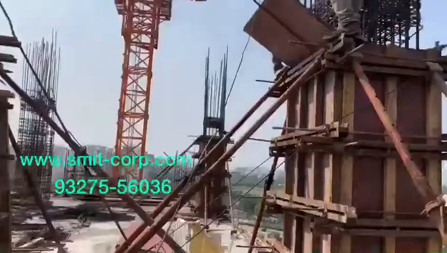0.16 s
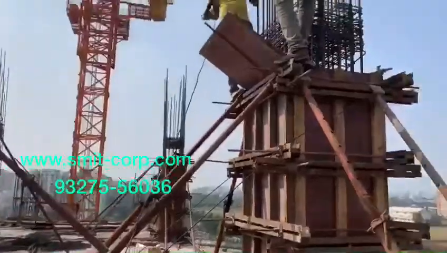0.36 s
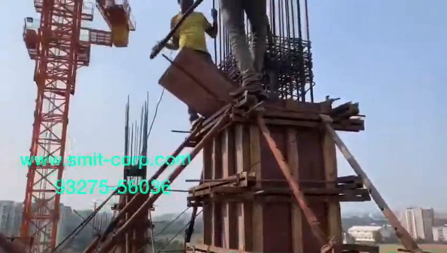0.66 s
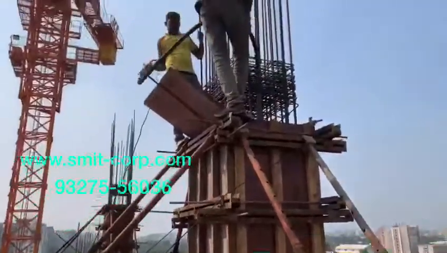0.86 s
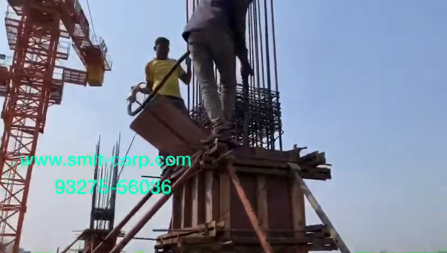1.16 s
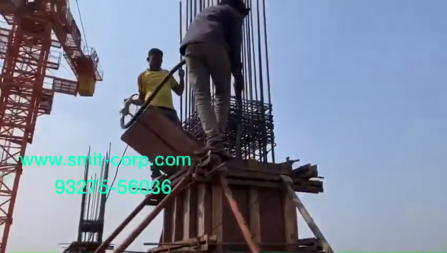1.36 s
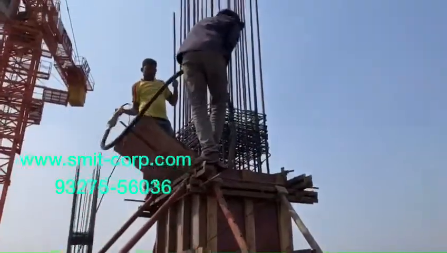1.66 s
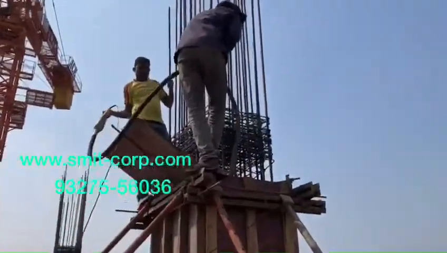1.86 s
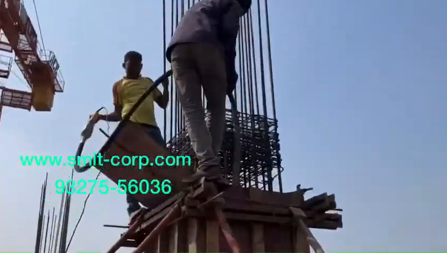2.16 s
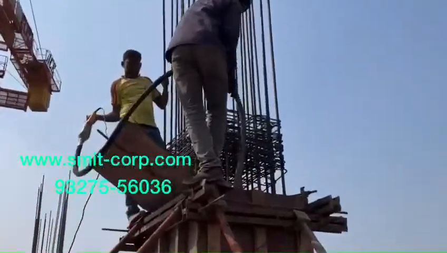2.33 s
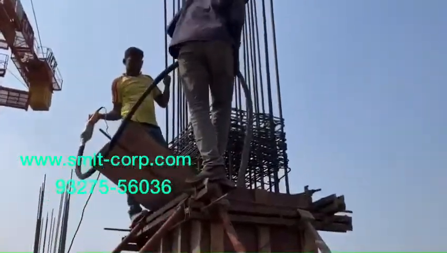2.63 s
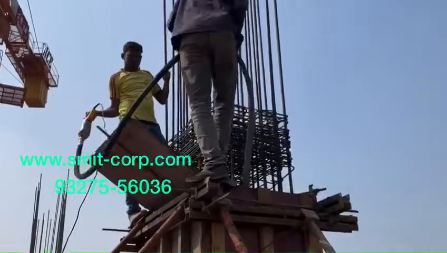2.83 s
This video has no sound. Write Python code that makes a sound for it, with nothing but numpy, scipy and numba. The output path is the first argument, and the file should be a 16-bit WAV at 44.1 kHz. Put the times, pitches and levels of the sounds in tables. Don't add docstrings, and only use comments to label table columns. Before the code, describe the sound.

High thin whine and hiss of a concrete poker vibrator, roughening with metallic squeals on an open building site

```python
import sys
import numpy as np
from scipy import signal
from scipy.fft import rfft, irfft, next_fast_len
from scipy.io import wavfile
from scipy.ndimage import uniform_filter1d
from numba import njit

SR = 44100
rng = np.random.default_rng(int(sys.argv[2]) if len(sys.argv) > 2 else 0)


def volts_from_decibels(level):
    exponent = np.asarray(level, float) / 20
    return 10 ** exponent


def bounce(signal):
    frames = np.transpose(np.atleast_2d(signal))
    limited = np.clip(frames, -1, 1)
    pcm = np.round(limited * 32767).astype(np.int16)
    wavfile.write(sys.argv[1], SR, pcm)


N = 131859

# f/Hz, level/dB
SITE_COLOUR = [(25, -44), (70, 2.5), (125, -6.5), (260, -49), (700, -20.5), (2200, -7), (3200, -19.5),
               (7000, -28.5)]
# f/Hz, level/dB
WIDE_COLOUR = [(30, -21), (150, -4), (300, -23), (800, -11), (1500, -7), (4000, -9.5), (6000, -12),
               (7000, -29)]
# f/Hz, level/dB
GENERATOR_HUM = [(51.15, -62), (102.3, -41.5), (153.5, -50.5), (204.6, -57.5)]
# t/s, level/dB, pitch factor, tilt above 400 Hz/(dB per octave)
KNOCKS = [
    (1.445, -17, .78, -11),
    (2.71, 0, 1.0, -.5),
]
# f/Hz, level/dB, t60/s, swell/s, right channel lag/rad
TIMBER_MODES = [(208.4, -15.5, 0.13, 0.013, 1.76), (285, -20.5, 0.35, 0.0099, 2.9),
                (472, -14, 0.099, 0.019, 0.66), (695, -14.5, 0.12, 0.0086, 1.24),
                (963, -16, 0.07, 0.0034, 0.27), (1300, -12.5, 0.057, 0.017, 0.11),
                (1713, -19.5, 0.07, 0.0041, 1.1), (2500, -21, 0.089, 0.0047, 2.1),
                (2690, -19, 0.072, 0.0044, .3)]
# t/s, level/dB
SQUEAL_LEVEL = [(0.0, -45), (1.21, -38.5), (1.24, -32), (1.39, -43), (1.57, -45), (1.66, -20.5),
                (1.76, -30.5), (1.8, -21.5), (1.83, -28.5), (1.99, -29), (2.02, -19.5), (2.07, -31.5),
                (2.3, -38.5), (2.55, -18), (2.6, -27), (2.64, -19.5), (2.76, -32), (2.99, -22.5)]
# offset from squeal f/Hz, width/Hz, level/dB
BAR_MODES = [(0, 30, 0), (-215, 70, -12)]
# start t/s, end t/s, level/dB
SECOND_BAR = [
    (1.21, 1.305, -52),
    (1.707, 1.975, -36.5),
    (2.423, 2.565, -42),
]
# t/s, rattle level/dB, loose rumble level/dB, sum tone gain/dB
CONTACT = [(0, -36, -47.5, -16), (.5, -40.5, -48, -9), (1.1, -37.5, -44, -11), (1.2, -33.5, -45.5, -10.5),
           (1.55, -31, -42, -10.5), (1.62, -27, -46.5, -3.5), (1.87, -22, -45, -5),
           (2.06, -28.5, -48, -2.5), (2.09, -36, -57, -10), (2.37, -40.5, -63.5, -15.5),
           (2.41, -27, -50.5, -0.5), (2.65, -23, -49.5, 2), (2.8, -19, -44.5, -4.5), (2.99, -24.5, -51, 3)]
# f/Hz, level/dB
SUM_TONES = [(667.5, -53), (861.3, -48), (974.4, -39), (1163, -35), (1222, -41), (1281, -38), (1470, -53),
             (1588, -48), (1771, -50), (1836, -51), (1890, -49), (1949, -48), (2024, -45), (2078, -50),
             (2137, -49), (2196, -45), (2266, -47), (2385, -43), (2503, -44), (2692, -39), (2853, -60),
             (2998, -46), (3117, -49), (3305, -52), (3607, -46), (3666, -49), (3725, -47), (3784, -49),
             (3854, -52), (3914, -50), (3957, -51), (4032, -51), (4124, -50), (4221, -50), (4280, -53),
             (4312, -52), (4533, -55), (4581, -55), (4635, -56), (4764, -58), (4947, -56), (5006, -59),
             (5136, -53), (5265, -57), (5464, -55)]
# multiple of roll pitch, level/dB
ROLL_HARMONICS = [(1, -47), (2, -55)]
# f/Hz, width/Hz, level/dB
FORMWORK = [(688, 50, -15), (888, 310, -10.5), (1232, 107, -5.5), (1347, 380, -7), (1910, 216, -6),
            (2184, 124, 0), (2414, 230, 3), (2967, 220, -6.5), (3752, 720, -0.5), (4334, 430, -4),
            (4800, 660, -5.5), (5990, 2000, 1)]
# f/Hz, level/dB
RUMBLE_COLOUR = [(100, -1.5), (200, 8), (330, 1), (800, -1), (1500, -8.5), (6500, -2), (7700, 11.5),
                 (8300, -35)]
# t/s, commutator whine f/Hz
SPEED = [(0, 11361), (.12, 11400), (.47, 11485), (.63, 11548), (.82, 11528), (1.08, 11600), (1.14, 11548),
         (1.25, 11580), (1.34, 11515), (1.43, 11560), (1.5, 11518), (1.58, 11552), (2.05, 11599),
         (2.32, 11604), (2.43, 11662), (2.72, 11664), (2.78, 11633), (2.99, 11654)]
# t/s, whine level/dB, brush and fan hiss level/dB
MOTOR_LEVEL = [(0.0, -27, -43), (0.06, -37, -37), (0.12, -29, -39.5), (0.22, -36.5, -41.5),
               (0.46, -30, -38), (0.59, -41.5, -39.5), (0.78, -31, -37.5), (0.82, -39.5, -39.5),
               (1.1, -30, -36.5), (1.55, -33.5, -37.5), (1.65, -31, -34), (2.56, -32, -32.5),
               (2.88, -34, -37), (2.99, -33, -35.5)]
# share of whine f, level/dB
WHINE_KIN = [(.5, -23), (.9667, -13), (.9333, -16)]
# f/Hz, level/dB
HISS_COLOUR = [(6800, -40), (7600, -22), (8050, -5), (8500, -1), (9200, -4), (9800, 0), (10900, -1),
               (11200, -7)]
# f/Hz, left lead/half turns
PORT_LEAD = [(0, 0), (950, .28), (1250, 0), (1650, 1), (2000, 2), (2550, 3), (2800, 4), (4500, 4),
             (5400, 5), (6000, 6), (6600, 6), (6800, 5.85), (7050, 5.8), (7400, 5), (9050, 5), (10300, 4),
             (11250, 4), (11350, 3.82)]
# f/Hz, left minus right level/dB
PORT_SHADOW = [(3500, -1), (5300, -10), (6500, 1.5)]
# t/s, upper f/Hz, depth/0-1, lower f/Hz, depth/0-1
DRIFTING_NOTCHES = [(0, 3150, .9, 2800, .3), (.4, 3250, .8, 2780, .3), (.85, 3600, .8, 2500, .8),
                    (1.15, 3080, .8, 2420, .7), (1.35, 2900, .8, 2450, .9), (1.6, 2900, .7, 2380, .4),
                    (1.8, 2980, .9, 2600, .1), (2.1, 3300, .9, 2850, .8), (2.3, 3300, .9, 2850, .9),
                    (2.45, 2930, .9, 2580, .2), (2.7, 3180, .6, 2560, .2), (2.99, 3180, .6, 2560, .3)]
# f/Hz, width/Hz, depth/0-1
STILL_NOTCHES = [(1060, 70, .7), (1390, 70, .7), (1650, 120, .3), (7300, 500, .6)]

FLICKER_DB = 1.3


def col(table, k):
    return np.interp(np.arange(N) / SR, *np.array(table)[:, [0, k]].T)


def unit(x):
    return x / np.sqrt(np.mean(x ** 2))


def noise(colour):
    hz, db = np.array(colour).T
    f = np.maximum(np.arange(N // 2 + 1) * SR / N, 1)
    gain = volts_from_decibels(np.interp(np.log(f), np.log(hz), db))
    return unit(irfft(rfft(rng.standard_normal(N)) * gain, N))


@njit
def svf(x, hz, width):
    y, b, l = np.empty(len(x)), 0., 0.
    for i in range(len(x)):
        g, k = np.tan(np.pi * hz[i] / SR), width / hz[i]
        v = (b + g * (x[i] - l)) / (1 + g * (g + k))
        b, l, y[i] = 2 * v - b, l + 2 * g * v, k * v
    return y


def resonate(x, hz, width, second_width):
    return unit(svf(svf(x, hz, float(width)), hz, float(second_width)))


def walk(rate):
    k = int(SR / rate)
    steps = np.repeat(rng.standard_normal(N // k + 1), k)
    return 1.3 * uniform_filter1d(uniform_filter1d(steps, k), k)[:N]


def tone(hz, wobble_db, blur):
    level = np.sqrt(2) * volts_from_decibels(wobble_db * walk(14))
    phase = 2 * np.pi * np.cumsum(hz) / SR + blur * walk(25.17)
    return level * np.sin(phase + 2 * np.pi * rng.random())


def cancel(x):
    for hz, width, depth in STILL_NOTCHES:
        x = x - depth * svf(x, hz * (1 + .01 * walk(4)), float(width))
    for k in (1, 3):
        x = x - col(DRIFTING_NOTCHES, k + 1) * svf(x, col(DRIFTING_NOTCHES, k), 170.)
    return x


def site():
    hum = sum(volts_from_decibels(db) * tone(np.full(N, hz), 2.0, 0.4) for hz, db in GENERATOR_HUM)
    low = cancel(volts_from_decibels(-39.5 + 3.3 * walk(7.98)) * noise(SITE_COLOUR))
    loose = volts_from_decibels(-2.5) * cancel(noise(WIDE_COLOUR)) * np.array([[1], [-1]])
    return hum + low + loose * volts_from_decibels(col(CONTACT, 2) + 10.0 + 3.3 * walk(6.86))


def knocks():
    thud_db, thud_width = -7, .3
    out, t = np.zeros((2, N)), np.arange(N) / SR
    for start, hit_db, pitch, tilt_db in KNOCKS:
        u = np.maximum(t - start, 0)
        for mode_hz, mode_db, t60, swell, lag in TIMBER_MODES:
            hz, width = mode_hz * pitch, thud_width * mode_hz
            db = hit_db + mode_db + tilt_db * max(np.log2(hz / 400), 0)
            thud = resonate(rng.standard_normal(N), np.full(N, float(hz)), width, width)
            thud = signal.hilbert(thud, next_fast_len(N))[:N]
            ring = np.exp(2j * np.pi * (hz * u + rng.random())) + volts_from_decibels(thud_db) * thud
            rise = np.sin(np.pi / 2 * np.minimum(u / swell, 1)) ** 2
            decay = np.exp(-np.log(1000) * np.maximum(u - swell, 0) / t60)
            turn = np.exp(1j * np.array([[.5], [-.5]]) * lag)
            out += rise * decay * volts_from_decibels(db) * np.imag(ring * turn)
    return out


def squeal():
    squeal_hz, second_hz, fade_s = 6815, 6014, .03
    pull, rest_hz = .42, 11570
    hz = squeal_hz + pull * (col(SPEED, 1) - rest_hz)
    rub, t = rng.standard_normal(N), np.arange(N) / SR
    spells = sum(volts_from_decibels(db) * np.clip(np.minimum(t - start, end - t) / fade_s, 0, 1)
                 for start, end, db in SECOND_BAR)
    second = spells * volts_from_decibels(2.5 * walk(40)) * tone(hz - squeal_hz + second_hz, 2, 1.2)
    first = sum(volts_from_decibels(db) * resonate(rub, hz + offset, width, 2 * width)
                for offset, width, db in BAR_MODES)
    return second + volts_from_decibels(col(SQUEAL_LEVEL, 1)) * first


def out_of_phase_lift(hz):
    lead = np.interp(hz, *np.array(PORT_LEAD).T)
    return 1 / max(abs(np.cos(np.pi / 2 * lead)), .6)


def poker():
    full_whine_hz, roll_hz, beat_hz = 11660, 243.8, 188.6
    bright_db, rattle_gate = .8, .25
    speed = col(SPEED, 1) / full_whine_hz
    tones = sum(volts_from_decibels(db + bright_db * np.log2(hz / 1200)) * out_of_phase_lift(hz) * tone(hz * speed, 3.2, .2)
                for hz, db in SUM_TONES)
    roll = sum(volts_from_decibels(db) * tone(k * roll_hz * speed, 2.27, 0.68) for k, db in ROLL_HARMONICS)
    gate = 1 + rattle_gate * tone(beat_hz * speed, 0.33, 0.48)
    hits = gate * rng.standard_normal(N)
    rattle = sum(volts_from_decibels(db + FLICKER_DB * walk(13)) * resonate(hits, np.full(N, float(hz)), width, 1.04 * width)
                 for hz, width, db in FORMWORK)
    rumble = roll * volts_from_decibels(37) + noise(RUMBLE_COLOUR)
    rumble = rumble * volts_from_decibels(col(CONTACT, 2) + 8.5 + FLICKER_DB * walk(8.68))
    return tones * volts_from_decibels(col(CONTACT, 3)) + unit(rattle) * volts_from_decibels(col(CONTACT, 1) - 2.5) + rumble


def motor():
    hz = col(SPEED, 1)
    whine = volts_from_decibels(2.5 * walk(50)) * tone(hz, 1.5, .6)
    whine = whine + sum(volts_from_decibels(db) * tone(share * hz, 2.8, 3.5) for share, db in WHINE_KIN)
    hiss = volts_from_decibels(col(MOTOR_LEVEL, 2) + 6.0 + FLICKER_DB * walk(10)) * noise(HISS_COLOUR)
    return volts_from_decibels(col(MOTOR_LEVEL, 1)) * whine + hiss


def echoes(near):
    top_hz, t60_s, level_db = 7500, .22, -16.5
    dull = signal.sosfilt(signal.butter(6, top_hz, fs=SR, output="sos"), near)
    t = np.arange(SR // 4) / SR
    decay = np.exp(-np.log(1000) * t / t60_s)
    tails = [unit(rng.standard_normal(len(t)) * decay) / np.sqrt(len(t)) for _ in range(2)]
    return volts_from_decibels(level_db) * np.array([signal.fftconvolve(dull, tail)[:N] for tail in tails])


def ports(x):
    f = np.arange(N // 2 + 1) * SR / N
    lead = np.interp(f, *np.array(PORT_LEAD).T)
    db = np.interp(f, *np.array(PORT_SHADOW).T)
    spectrum = rfft(x)
    return np.array([irfft(spectrum * np.exp(.5j * np.pi * side * lead) * volts_from_decibels(.5 * side * db), N)
                     for side in (1, -1)])


def scene():
    near = cancel(motor() + poker()) + squeal()
    return ports(near) + echoes(near) + site() + knocks()


def low_pass(x):
    return signal.sosfilt(signal.butter(12, 13000, fs=SR, output="sos"), x)


def record(dry):
    cut = signal.sosfilt(signal.ellip(12, 1, 70, 11700, fs=SR, output="sos"), dry)
    return low_pass(cut)


dry = scene()
out = record(dry)
bounce(out)
```